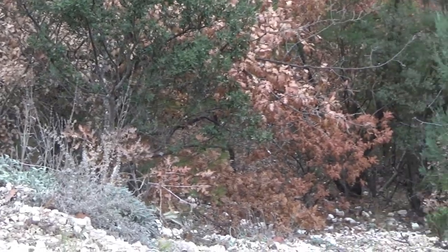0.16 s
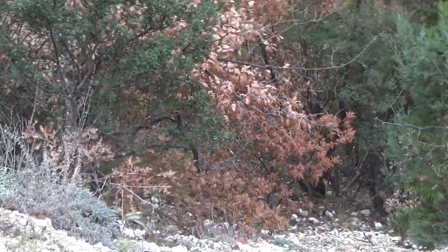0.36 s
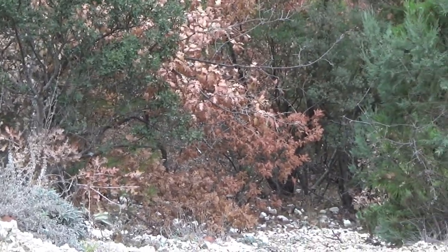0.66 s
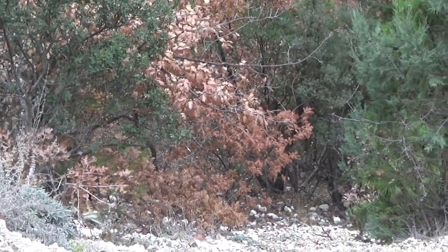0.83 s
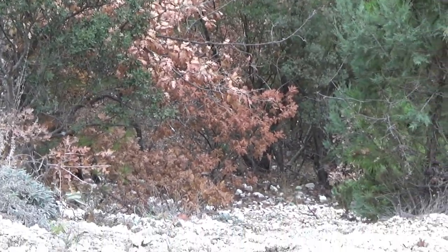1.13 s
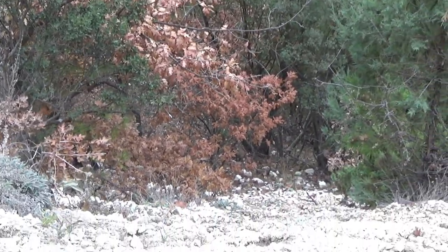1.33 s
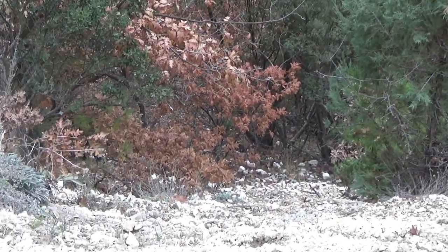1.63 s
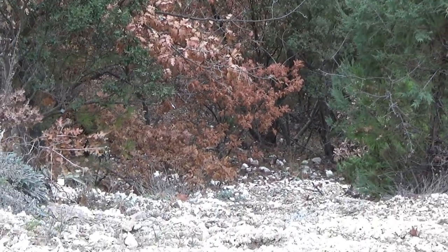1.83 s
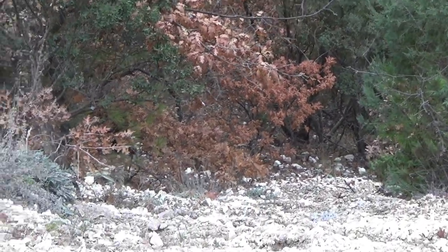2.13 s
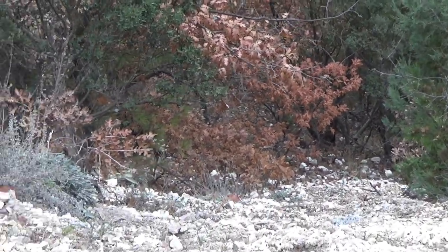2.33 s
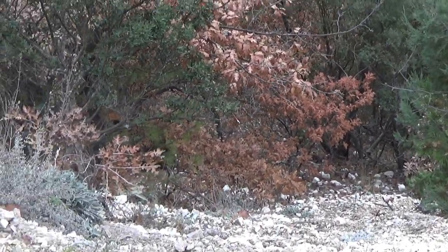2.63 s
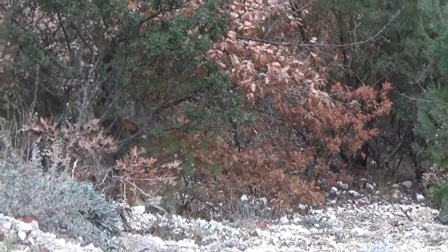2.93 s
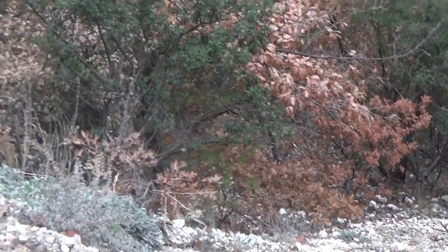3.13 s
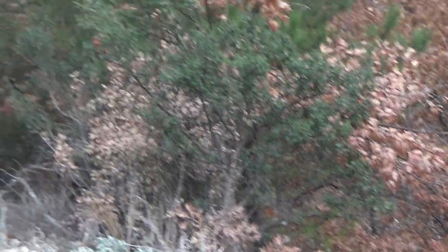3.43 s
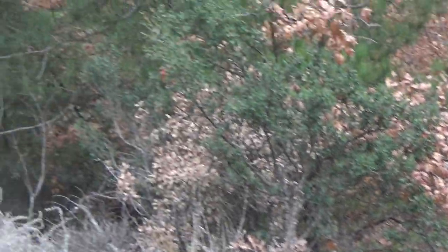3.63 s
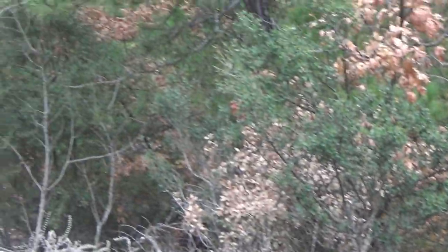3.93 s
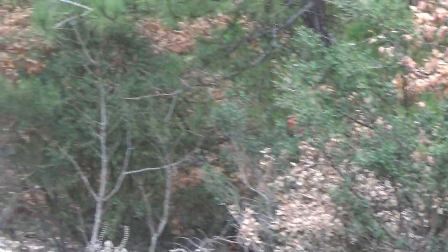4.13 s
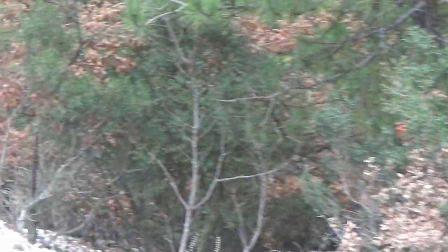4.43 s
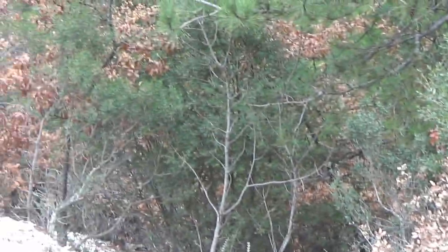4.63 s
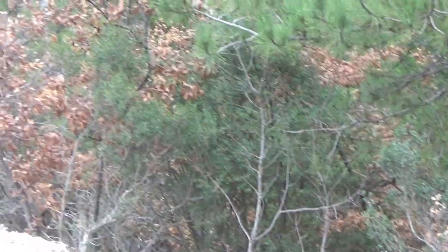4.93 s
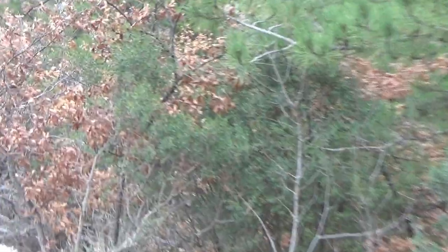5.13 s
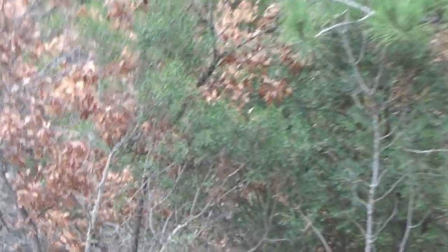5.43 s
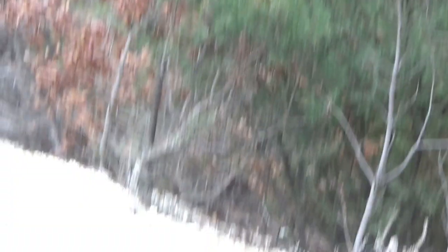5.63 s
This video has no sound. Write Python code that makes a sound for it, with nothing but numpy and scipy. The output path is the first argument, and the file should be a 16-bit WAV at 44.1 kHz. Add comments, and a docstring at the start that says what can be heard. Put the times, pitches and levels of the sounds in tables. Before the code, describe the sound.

In open woodland, a faint rustle and hollow background air are broken at once by a scrape and brittle twig snaps. Separate cracks follow over soft litter crunch, then a quieter pause. From the middle, dry leaves hiss and tick in strong sweeps, getting louder as an animal nears. Thuds and a dense cluster of cracks finish it. Small microphone, nearly centred, wood and ground slightly left, little echo.

```python
"""A faint rustle over open air is broken almost at once by twigs scraping and snapping in dry undergrowth.
An animal pushes through and comes closer: leaves hiss and tick past in swells made of tiny noise bursts.
Litter and soil crunch as patchy noise, footfalls thud as swells of low noise, and a hollow drone swells behind.
Scrapes, low thuds and a high swish are uneven noise through one resonance each; snaps are decaying noise
bursts, each with a ringing sine. All is nearly straight ahead, wood and ground leaning left, slightly wide."""
import sys
import numpy as np
from scipy import signal
from scipy.fft import rfft, irfft, next_fast_len
from scipy.io import wavfile
from scipy.ndimage import uniform_filter1d, map_coordinates

SR = 44100
rng = np.random.default_rng(int(sys.argv[2]) if len(sys.argv) > 2 else 0)


def inscribe(sig):
    """Save sig as 16-bit PCM at rate SR to the path in sys.argv[1].

    A 1-D sig is mono; a 2-D sig holds one channel per row.
    Samples are clipped to [-1, 1] before scaling.
    """
    pcm = np.round(np.clip(np.atleast_2d(sig).T, -1, 1) * 32767)
    wavfile.write(sys.argv[1], SR, pcm.astype(np.int16))


N = 254495  # length in samples
TOP_HZ = 16000  # upper band limit of the whole scene


def amp(db):
    """Decibels to gain."""
    return 10 ** (np.asarray(db) / 20)


def unit(x):
    """Scale to rms 1."""
    return x / np.sqrt(np.mean(x ** 2) + 1e-20)


def along(points, hz):
    """Read a curve of (Hz, value) points on a log frequency axis."""
    f, v = np.transpose(points)
    return np.interp(np.log(hz + 1), np.log(f + 1), v)


def level_curve(rows):
    """Join (seconds, dB) rows into one level per sample."""
    seconds, db = np.transpose(rows)
    return np.interp(np.arange(N) / SR, seconds, db)


def wobble(rate):
    """A smooth random curve with rate knots a second."""
    knots = rng.standard_normal(int(N * rate / SR) + 4)
    return map_coordinates(knots, [np.arange(N) * rate / SR])


def filtered(x, response):
    """Shape x with a gain given as a function of frequency."""
    m = next_fast_len(N + SR // 4)
    gain = response(np.fft.rfftfreq(m, 1 / SR))
    return irfft(rfft(x, m) * gain, m)[..., :N]


def coloured(x, spectrum):
    """Shape x with a (Hz, dB) spectrum, at rms 1."""
    return unit(filtered(x, lambda hz: amp(along(spectrum, hz))))


def band_noise(lo_hz, hi_hz, size):
    """A short stretch of noise in one band, rms 1."""
    edges = np.clip([lo_hz, hi_hz], 20, SR / 2 - 100)
    band = signal.butter(3, edges, "band", fs=SR, output="sos")
    return unit(signal.sosfilt(band, rng.standard_normal(size)))


def add(track, s, sound):
    """Mix a sound into the track at s seconds."""
    part = track[max(round(s * SR), 0):][:len(sound)]
    part += sound[:len(part)]


def crackle(rate, spread_db, life):
    """Noise bursts of random time and size, rate a second, each fading over life seconds; rms 1."""
    starts = rng.random(N) < rate / SR
    sizes = starts * amp(spread_db * np.clip(rng.standard_normal(N), -2, 2))
    energy = signal.lfilter([1], [1, -np.exp(-2 / (life * SR))], sizes ** 2)
    return unit(np.sqrt(energy) * rng.standard_normal(N))


def patchy(x, depth_db):
    """Different leaves and stems sound in turn: random gain patches over time and frequency."""
    z = signal.stft(x, nperseg=512)[2]
    field = uniform_filter1d(rng.standard_normal(z.shape), size=4, axis=0)  # across frequency
    field = uniform_filter1d(field, size=14, axis=1)  # across time
    return signal.istft(z * amp(depth_db * unit(field)), nperseg=512)[1][:N]


def swells(rows, rise, resting_db):
    """Gain of a resting level with smooth swells on top; rise is the share of each one before its peak."""
    t, power = np.arange(N) / SR, amp(resting_db) ** 2
    rise = np.clip(rise, .1, .9)
    for s, length, db in rows:
        side_s = length * np.where(t < s, rise, 1 - rise)
        phase = np.clip((t - s) / side_s, -1, 1)
        power = power + (amp(db) * np.cos(phase * np.pi / 2) ** 1.2) ** 2
    return np.sqrt(power)


# The body sliding through the foliage. Each row: time in seconds, level in dB before the flutter.
BRUSH = [(0, -52), (.7, -49), (1.12, -51.5), (1.3, -50), (1.8, -51.5), (2.53, -50), (2.62, -37.5),
         (3.13, -39), (3.27, -44), (3.59, -42), (3.68, -33), (4.15, -35.5), (4.39, -36.5), (4.7, -32),
         (5.1, -38.5), (5.77, -39.5)]
# Leafy boughs swept aside. Each row: loudest at in seconds, length in seconds, level in dB before the flutter.
SWEEPS = [(.11, 0.07, -41), (.23, .1, -51), (.5, 0.11, -48), (1.21, 0.096, -44), (1.88, 0.018, -42),
          (2.25, 0.055, -41.5), (2.36, 0.18, -42.5), (2.7, 0.14, -42.5), (2.83, 0.084, -44),
          (3.03, 0.21, -37), (3.4, 0.16, -36.5), (3.54, .06, -35), (3.665, 0.087, -31),
          (3.73, 0.097, -29.5), (3.83, 0.07, -33), (4.01, .07, -36), (4.21, 0.041, -33),
          (4.68, 0.092, -31.5), (4.915, 0.083, -30.5), (5.48, 0.031, -34.5), (5.65, 0.094, -37.5)]
SWEEP_RISE = 0.49  # share of a sweep spent bending the bough
# Tone of the dry leaves. Each row: frequency in Hz, relative level in dB per Hz.
LEAF = [(500, -54), (900, -35), (1300, -23), (1700, -13.5), (2440, -12), (3380, -11), (3900, -11),
        (5070, -8), (6180, 0), (6760, 0.5), (7760, -3), (10300, -3), (11500, -7), (15500, -14.5)]


def leaves():
    """Dry leaves slide over the body, louder with each bough: a dense hiss of contacts with ticks standing out."""
    contacts = crackle(rate=6000, spread_db=2.8, life=.0007)
    ticks = amp(-11.5) * crackle(rate=110, spread_db=4.5, life=.0004)
    rustle = coloured(patchy(contacts + ticks, depth_db=1.37), LEAF)
    flutter = amp(0.97 * wobble(45) + 0.51 * wobble(21))
    return swells(SWEEPS, SWEEP_RISE, level_curve(BRUSH)) * flutter * rustle


# Tone of the distant background. Each row: frequency in Hz, relative level in dB per Hz.
AIR = [(150, 5.5), (330, 6), (520, 2.5), (760, -13), (1000, 8.5), (1300, -8), (1700, 7.5), (2300, -13),
       (3150, 1.5), (4500, -12), (12000, -9)]
AIR_DB = -56  # level before its slow drift


def open_air():
    """The distant background is patchy noise whose level drifts slowly."""
    hush = coloured(patchy(rng.standard_normal(N), depth_db=3.0), AIR)
    return amp(AIR_DB + 2.3 * wobble(4.7)) * hush


# The hollow drone swelling. Each row: loudest at in seconds, length in seconds, level in dB.
DRONE_SWELLS = [(.45, 1.6, -55), (1.35, 0.46, -53), (1.7, 0.65, -51), (3.4, 0.56, -48), (4.23, 0.52, -49),
                (4.77, 0.27, -47.5), (5.08, 0.19, -49)]
DRONE_DB, DRONE_RISE = -61.5, 0.47  # resting level; share of a swell spent rising
# Tone of the drone. Each row: frequency in Hz, relative level in dB per Hz.
DRONE = [(100, -24), (230, -10), (335, 2.5), (420, -7), (560, -22.5), (1200, -44)]


def hollow_drone():
    """The drone of the open air is noise gathered in a low-mid hump, swelling over a resting level."""
    return swells(DRONE_SWELLS, DRONE_RISE, DRONE_DB) * coloured(rng.standard_normal(N), DRONE)


APPROACH_S, APPROACH_DB_PER_S = 1.92, 3.5  # the animal heads this way from here on


def approach_db():
    """The steady rise in dB as the animal comes closer."""
    return APPROACH_DB_PER_S * np.maximum(np.arange(N) / SR - APPROACH_S, 0)


# Dry litter giving way under the animal. Each row: time in seconds, level in dB before the flutter.
TREAD = [(0, -56), (.7, -50.5), (1.12, -53.5), (1.33, -48.5), (2.05, -59), (3.1, -65), (3.45, -48.5),
         (3.9, -51), (4.3, -43.5), (4.48, -49.5), (4.75, -45), (5.77, -47)]
# Tone of the litter. Each row: frequency in Hz, relative level in dB per Hz.
LITTER = [(600, -20), (1200, -5), (1750, 2), (2400, 0), (3400, -2.5), (5000, -2.5), (12000, -15)]
# Tone of the scuffed soil. Each row: frequency in Hz, relative level in dB per Hz.
SOIL = [(200, -16), (450, 7), (700, 2.5), (1000, -2), (1400, -9), (2500, -25)]
# Soil level in dB before the approach and flutter, and its share of the tread's and the approach's swings.
SOIL_DB, SOIL_FOLLOWS, SOIL_NEARS = -59, .45, 0.46


def litter_and_soil():
    """One crunch of noise and sparse crackles drives both the dry litter and the duller soil scuffed with it."""
    tread_db = level_curve(TREAD)
    soil_db = SOIL_DB + SOIL_FOLLOWS * (tread_db - tread_db.mean()) + SOIL_NEARS * approach_db()
    crunch = rng.standard_normal(N) + amp(-5.0) * crackle(rate=90, spread_db=4, life=0.0033)
    litter = amp(tread_db + 2.54 * wobble(25)) * coloured(patchy(crunch, depth_db=3.0), LITTER)
    soil = amp(soil_db + 1.4 * wobble(30)) * coloured(patchy(crunch, depth_db=3.5), SOIL)
    return litter + soil


# Weight coming down on the earth. Each row: loudest at in seconds, length in seconds, level in dB before flutter.
FOOTFALLS = [(.24, 0.18, -55), (.58, 0.33, -55), (.85, 0.26, -58.5), (1.25, 0.11, -54), (2.04, 0.17, -55),
             (2.65, .2, -52.5), (3.0, 0.22, -57), (3.17, 0.13, -55), (3.83, 0.33, -45.5), (4.05, 0.16, -48),
             (4.24, 0.054, -47), (4.68, 0.1, -40), (4.92, 0.13, -49), (5.18, 0.17, -40), (5.3, 0.052, -40),
             (5.49, 0.12, -42), (5.75, .14, -42)]
FOOT_RISE = 0.52  # share of a footfall spent loading the foot
RUMBLE_DB = -61.5  # the earth between footfalls, before the approach and flutter
# Tone of the earth. Each row: frequency in Hz, relative level in dB per Hz.
EARTH = [(20, -21), (40, -13), (62, -3.5), (80, -2), (130, -1), (220, -1.5), (310, -13), (500, -18.5),
         (900, -43)]


def earth():
    """Low noise thumps under each footfall; the rumble between them grows louder as the animal nears."""
    weight = swells(FOOTFALLS, FOOT_RISE, RUMBLE_DB + approach_db())
    return weight * amp(2.4 * wobble(22)) * coloured(rng.standard_normal(N), EARTH)


# Scrapes, low thuds and a high swish.
# Each row: start in seconds, end in seconds, resonance in Hz, width in Hz, level in dB.
SCRAPES = [(0.055, 0.072, 4240, 895, -42), (0.075, 0.143, 1060, 140, -45.5), (0.121, 0.22, 990, 60, -53),
           (0.079, .145, 5870, 600, -47.5), (.785, .827, 1670, 160, -31.5), (0.9, .939, 1590, 230, -42),
           (0.937, 0.981, 1670, 300, -43), (1.187, 1.296, 630, 500, -53), (1.242, 1.504, 12800, 3500, -55),
           (3.415, 3.454, 4700, 1500, -45.5), (4.646, 4.68, 606, 350, -41), (4.673, 4.704, 320, 148, -31),
           (4.711, 4.724, 696, 300, -33.5), (5.002, 5.026, 820, 450, -39.5), (5.079, 5.124, 700, 450, -43),
           (5.156, 5.18, 348, 200, -45.5), (5.238, 5.261, 646, 500, -40), (5.408, 5.433, 4200, 900, -39.5),
           (5.638, 5.691, 1880, 700, -40.5), (5.665, 5.713, 510, 450, -41.5)]


def scrapes():
    """Scrapes, low thuds and a high swish: uneven noise through one resonance each."""
    out = np.zeros(N)
    for start, end, hz, width_hz, db in SCRAPES:
        size = max(round((end - start) * SR), SR // 100)
        roughness = 0.78 + (rng.random(size) < 1200 / SR) * 4  # stronger kicks, about 1200 a second
        uneven = rng.standard_normal(size) * roughness
        drive = np.pad(uneven * signal.windows.tukey(size, .3), (0, SR // 50))  # room to ring out
        centre = min(hz, TOP_HZ)
        resonant = signal.lfilter(*signal.iirpeak(centre, centre / width_hz, SR), drive)
        # little radiates below the resonance
        resonant = signal.lfilter(*signal.butter(2, centre / 2, "high", fs=SR), resonant)
        add(out, start, amp(db) * resonant / np.std(resonant[:size]))
    return out


# Twigs breaking. Each row: start in seconds, crack level in dB, knock in dB over the crack,
# treble in dB over the crack, ring in Hz, ring level in dB, time to fall by 60 dB in seconds.
# Levels are those before the attack and decay.
SNAPS = [(0.066, -10.5, -17, -8, 4130, -11, 0.011), (0.0701, -20, -9, 0, 5430, -21, 0.027),
         (.769, -23, -13, -26, 1850, -17, 0.019), (0.7722, -26.5, -12, -27, 1690, -20.5, 0.051),
         (.9441, -37.5, -1, -5, 1940, -33, 0.032), (1.0327, -18, -14.5, -5.5, 5970, -14.5, 0.015),
         (1.038, -25, -22, -9, 5730, -25, 0.015), (1.0435, -24.5, -21, -13, 6000, -29, 0.026),
         (1.2436, -30.5, -10, -12, 780, -35, 0.02), (1.259, -31, -0.5, -7, 5720, -28, 0.019),
         (1.5283, -38, -11, 1, 7040, -35, .015), (1.9452, -30.5, -20, -3.5, 3000, -26.5, 0.012),
         (2.0665, -42, -4, -14, 2100, -46, 0.042), (2.2323, -35, -5, -1, 5670, -37, .022),
         (2.3278, -26.5, -12.5, 5.5, 6430, -21, 0.017), (3.653, -37, -24, 13, 6650, -24, 0.024),
         (3.6713, -21, -34, 10, 6800, -13.5, 0.0074), (3.7265, -24, -23, -14, 6650, -30.5, .0074),
         (4.2825, -37.5, 3, -16, 5440, -28, 0.041), (4.719, -21.5, -17, -21, 663, -22, .028),
         (4.7706, -33.5, 5, 11, 443, -21, .019), (4.8452, -31, 3, -15, 710, -28, 0.016),
         (5.0705, -45, 4, -2, 960, -29.5, 0.031), (5.115, -30, 7, -13, 2340, -23, 0.0076),
         (5.2099, -20.5, -20, -24, 3350, -11, 0.015), (5.21, -29, -14, -23, 2060, -15, 0.049),
         (5.2124, -26, -26, -19, 2016, -18, 0.035), (5.339, -32.5, -22, -22, 3340, -22, 0.025),
         (5.3394, -23.5, -23, -25, 2066, -20.5, 0.027), (5.371, -29, -5, -17, 2230, -28, 0.015),
         (5.413, -39, -15, 1, 3770, -27, .021), (5.487, -30, 0, -11, 6800, -36.5, 0.016),
         (5.589, -35.5, -2, -12, 2360, -33.5, 0.026), (5.7012, -42, -1, -14, 2700, -25, 0.016)]


def twigs():
    """Each fracture is a few milliseconds of noise, and the freed piece of wood rings briefly."""
    out, size = np.zeros(N), SR // 20
    t = np.arange(size) / SR
    attack = 1 - np.exp(-t / .00013)
    for s, db, knock_db, treble_db, ring_hz, ring_db, t60 in SNAPS:
        lowest_hz = np.clip(0.96 * ring_hz, 1500, 3100)  # thinner twigs crack higher
        crack = band_noise(lowest_hz, 7240, size)
        knock = amp(knock_db) * band_noise(320, 2030, size)
        treble = amp(treble_db) * band_noise(8100, 13400, size)
        ring = amp(ring_db) * np.sin(2 * np.pi * ring_hz * t)
        decay = amp(-60 * t / t60)
        add(out, s, (amp(db) * (crack + knock + treble) + ring) * decay * attack)
    return out


# Placement of the twigs and scrapes. Each row: frequency in Hz, left minus right in dB.
WOOD_LEAN = [(300, 9.5), (900, -1.5), (1700, 5.5), (2400, 2.5), (6000, 1.4), (12000, 1)]
# Placement of the ground and the air behind. Each row: frequency in Hz, left minus right in dB.
GROUND_LEAN = [(80, 2.5), (200, 1.5), (350, 4), (700, 1), (1300, 3), (2500, 0.5), (5000, 0.5)]
# Slight stereo width, mostly in the lows. Each row: frequency in Hz, level of the noise tail in dB.
WIDTH = [(60, -20), (1000, -16.5), (3000, -60), (6000, -36), (14000, -71)]
SIDES = np.array([[1], [-1]])  # left, right


def placed(x, lean):
    """Set x between left and right by level difference alone."""
    return filtered(x, lambda hz: amp(SIDES * along(lean, hz) / 2))


def stereo_width(x):
    """Slight stereo width: a faint decaying noise tail, opposite in sign left and right, mostly in the lows."""
    t = np.arange(SR // 8) / SR
    tail = rng.standard_normal(len(t)) * amp(-60 * t / 0.22)  # at a rate of 60 dB in 0.22 s, cut off sooner
    smeared = signal.fftconvolve(x, tail / np.linalg.norm(tail))[:N]
    return SIDES * filtered(smeared, lambda hz: amp(along(WIDTH, hz)))


def scene():
    """The leaves are straight ahead, wood and ground lean left, and a faint noise tail adds slight width."""
    foliage = leaves()
    ground = open_air() + hollow_drone() + litter_and_soil() + earth()
    wood = scrapes() + twigs()
    direct = foliage + placed(ground, GROUND_LEAN) + placed(wood, WOOD_LEAN)
    return direct + stereo_width(foliage + ground + wood)


def record(dry):
    """The small microphone loses the deepest bass, and nothing is kept from the band limit up."""
    thinned = signal.lfilter(*signal.butter(2, 42, "high", fs=SR), dry)
    return filtered(thinned, lambda hz: hz < TOP_HZ)


dry = scene()
out = record(dry)
inscribe(out)
```